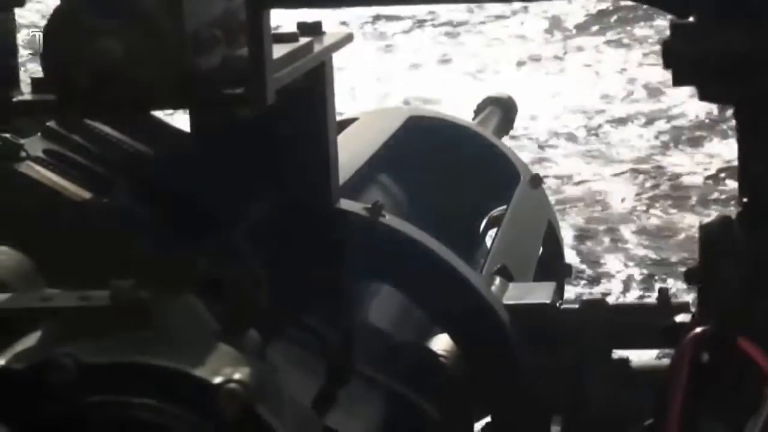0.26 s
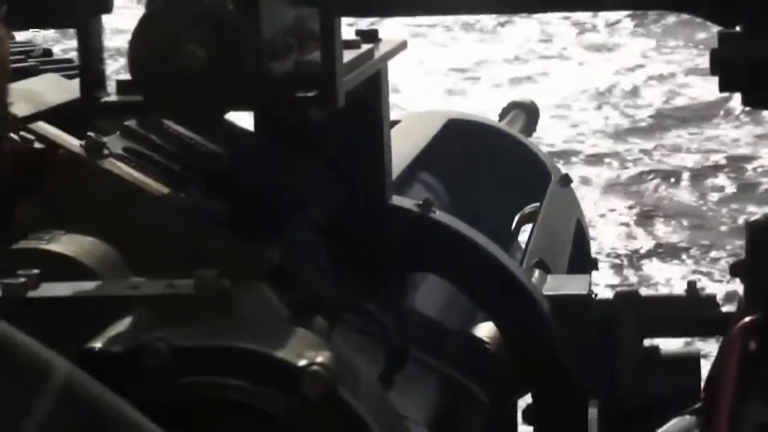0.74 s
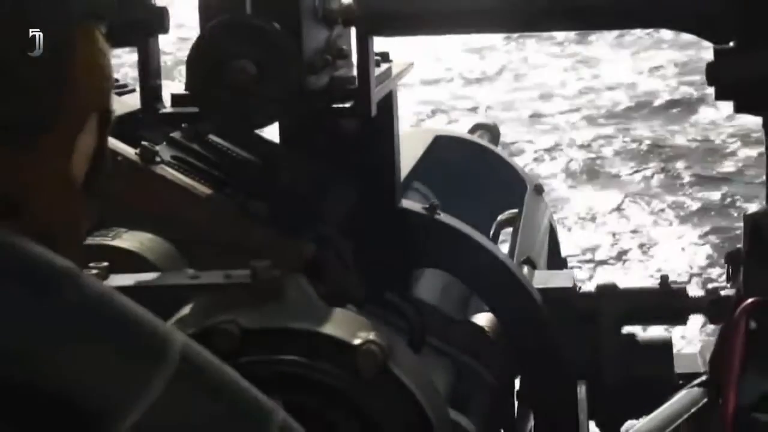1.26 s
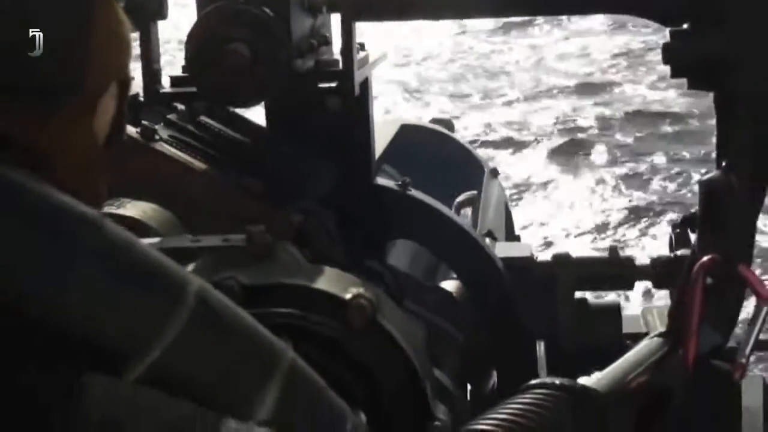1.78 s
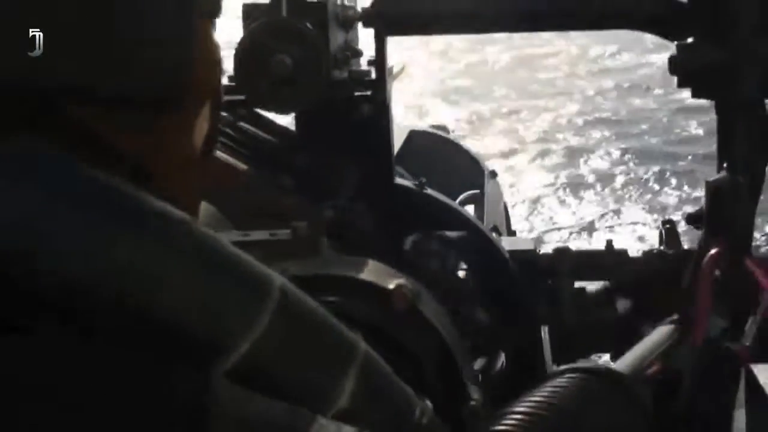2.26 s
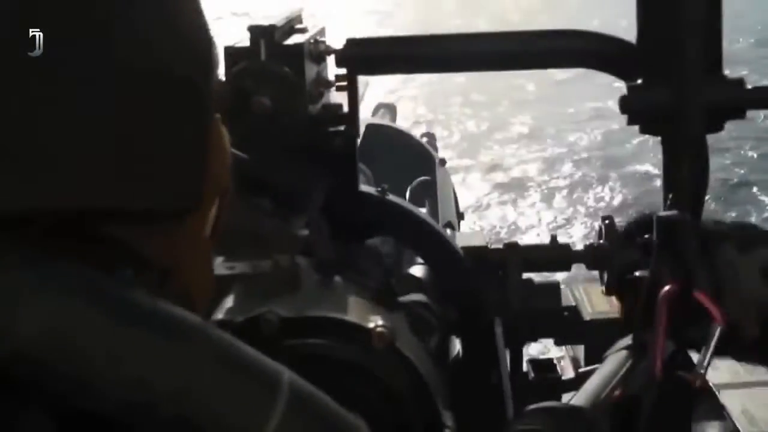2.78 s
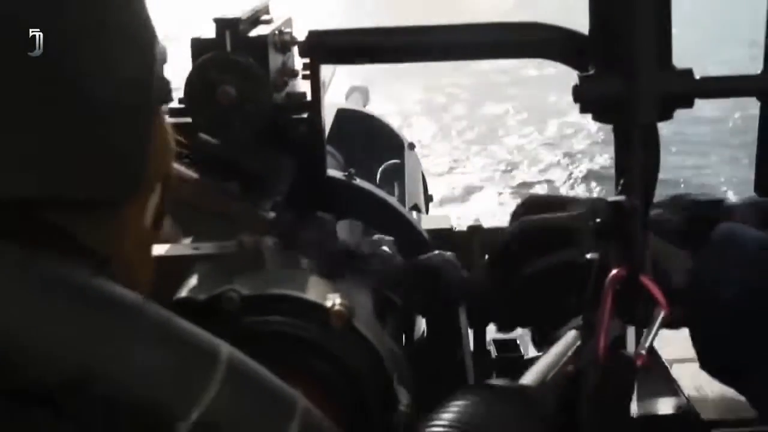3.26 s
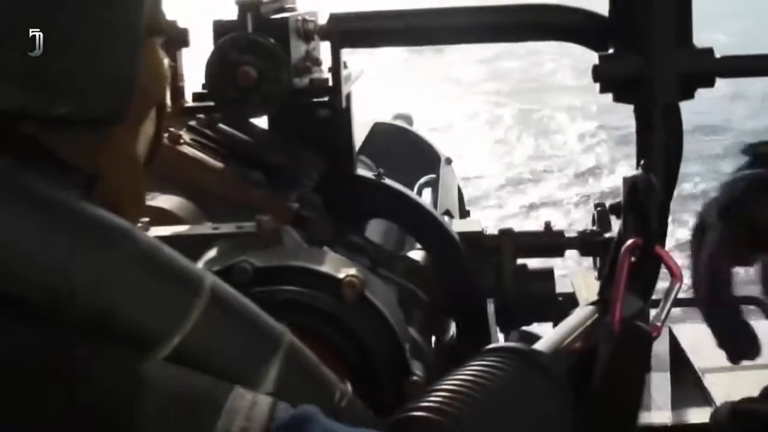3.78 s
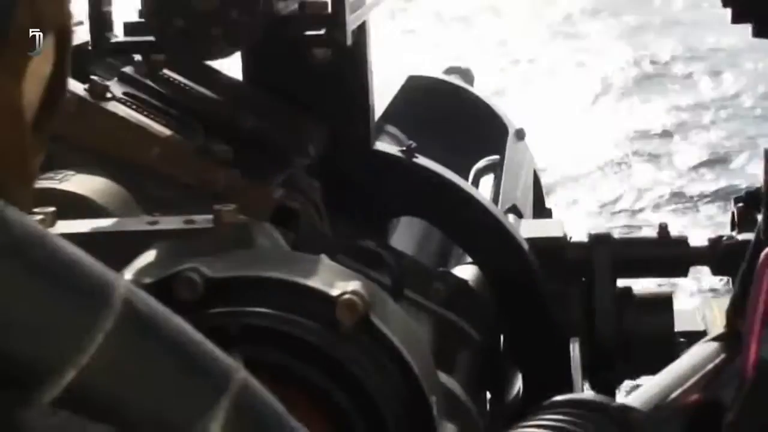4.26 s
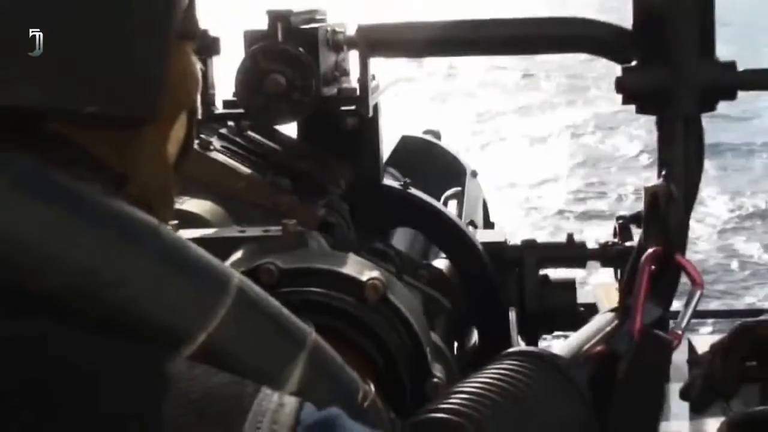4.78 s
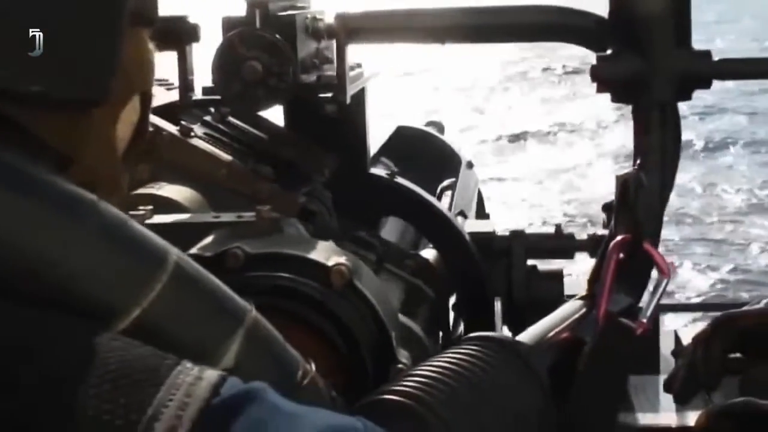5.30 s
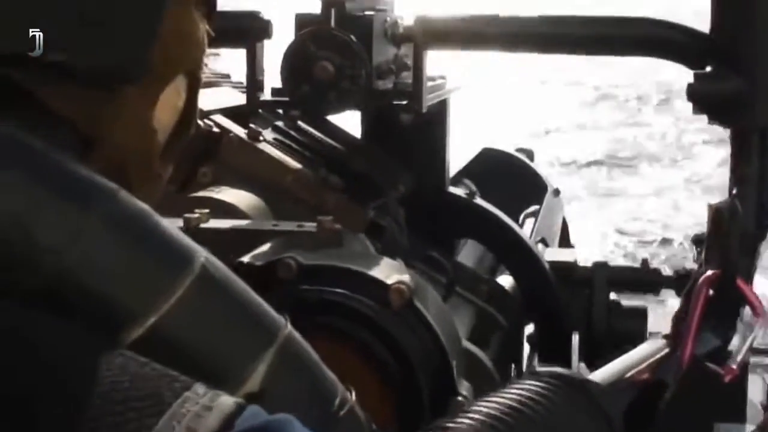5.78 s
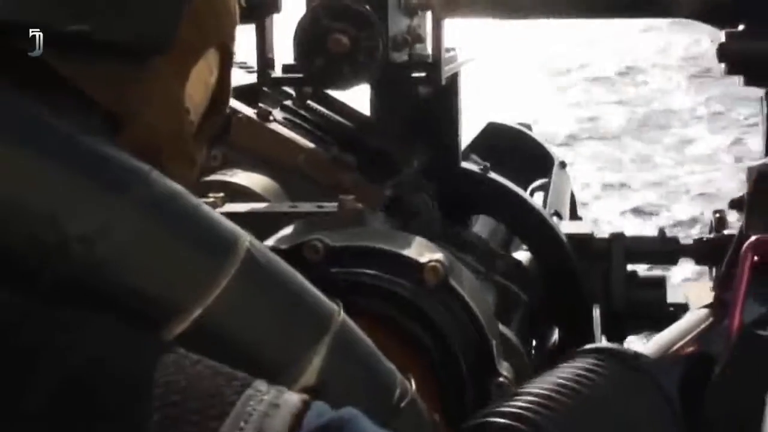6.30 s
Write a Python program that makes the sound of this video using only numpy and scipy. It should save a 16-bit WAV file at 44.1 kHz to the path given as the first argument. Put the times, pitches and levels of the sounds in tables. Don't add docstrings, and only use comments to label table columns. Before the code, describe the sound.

Motor-driven cannon on a boat deck fires a five-round burst, then a single late shot, with clanking bolt, clinking cases and engine hum between.

```python
import sys
import numpy as np
from scipy import signal
from scipy.fft import rfft, irfft, next_fast_len
from scipy.io import wavfile
from scipy.ndimage import uniform_filter1d, map_coordinates

SR = 44100
rng = np.random.default_rng(int(sys.argv[2]) if len(sys.argv) > 2 else 0)


def invert_db(x):
    u = np.asarray(x, float) / 20
    return 10 ** u


def transcribe(signal):
    frames = np.atleast_2d(signal).T
    limited = np.clip(frames, -1, 1)
    pcm = np.round(limited * 32767).astype(np.int16)
    wavfile.write(sys.argv[1], SR, pcm)


N = 288414

# t/s, blast level ahead of the limiter/dB
SHOTS = [
    (-0.55, -3),
    (2.058, 4.5),
    (2.352, 3.5),
    (2.650, 1),
    (2.950, 2),
    (3.248, 1),
    (6.369, 2),
]
# press t/s, release t/s, motor already turning for/s, rattle level/dB
PULLS = [
    (1.834, 3.439, .025, -0.5),
    (6.145, 6.6, .06, 2),
]
# f/Hz, level per Hz/dB
CHAIN_COLOUR = [(88, -42.5), (150, -10), (462, -12.5), (618, -1), (2410, -2.5), (2790, -7.5), (3230, -4.5),
                (4810, -9), (5460, -7), (10500, -15.5), (11500, -22), (15000, -54.5), (22000, -120)]


def unit(x):
    return x / np.sqrt(np.mean(x ** 2) + 1e-20)


def along(points, hz):
    f, *cols = np.transpose(points)
    return [np.interp(np.log(hz + 1), np.log(f + 1), c) for c in cols]


def wobble(rate):
    knots = rng.standard_normal(int(N * rate / SR) + 4)
    return map_coordinates(knots, [np.arange(N) * rate / SR])


def filtered(x, response):
    m = next_fast_len(len(x) + 8192)
    return irfft(rfft(x, m) * response(np.fft.rfftfreq(m, 1 / SR)), m)[:len(x)]


def colour(spectrum, f):
    return invert_db(along(spectrum, np.minimum(f, 11400))[0])


def peaks(table, f):
    return sum(invert_db(db) / (1 + (2 * (f - c) / w) ** 2) for c, w, db in table)


def noise_decay(t, t60):
    return rng.standard_normal(len(t)) * invert_db(-60 * t / t60)


def add(track, s, sound):
    part = track[round(s * SR):][:len(sound)]
    part += sound[:len(part)]


def ring(modes, t, scatter_db):
    hz, db, t60 = np.transpose(modes)[:, :, None]
    luck = rng.standard_normal((2, len(modes), 1))
    envelope = invert_db(db + scatter_db * luck[1] - 60 * t / t60)
    tones = np.sin(2 * np.pi * hz * (1 + 0.0014 * luck[0]) * t) * envelope
    return tones.sum(0) / np.linalg.norm(invert_db(db))


def chatter(sound, t, spread):
    short = t[:SR // 20]
    contacts = rng.standard_normal(len(short)) ** 3 * (short / spread) ** .5 * np.exp(-short / spread)
    return signal.fftconvolve(sound, contacts / np.linalg.norm(contacts))[:len(t)]


def knock(t, t60):
    # f/Hz, level/dB, t60/s
    deck_modes = [(700, -4, .09), (880, 0, .07), (1010, 0, .07), (1425, 0, .09), (2050, -3, .05)]
    puff = filtered(noise_decay(t, t60), lambda f: f / 900 / (1 + (f / 1700) ** 7))
    return .55 * ring(deck_modes, t, scatter_db=3.5) * (1 - np.exp(-t / .003)) + 2.1 * puff


def sea():
    hiss = filtered(rng.standard_normal(N), lambda f: (f > 1200) / (1 + (f / 2500) ** 1.5))
    return invert_db(-73.5) * unit(hiss)


def steady_tone(hz, db):
    phase = 2 * np.pi * np.cumsum(hz + .6 * wobble(6)) / SR
    return np.sqrt(2) * invert_db(db + 1.5 * wobble(10)) * np.sin(phase)


def engine():
    # t/s, firing tone level/dB
    tone_levels = [(0, -64), (.232, -66), (.364, -50), (.572, -53), (.744, -55), (.892, -55.5), (1.21, -53),
                   (1.292, -51), (1.82, -46), (3.9, -64.5), (4.1, -52), (4.16, -50), (4.23, -48),
                   (4.34, -50.5), (5.22, -49.5), (5.66, -42.5), (5.96, -41), (6.12, -41)]
    # f/Hz, level per Hz/dB
    rumble_colour = [(12, -39), (20, -3.5), (54, -2), (108, 0), (166, -3.5), (221, -6.5), (306, -7),
                     (361, -16.5), (399, -9), (531, -17), (612, -12), (939, -15.5), (1300, -20),
                     (1650, -35), (2600, -49.5), (3380, -76), (5720, -120)]
    # f/Hz, level/dB
    hum_tones = [(264, -61.5), (312, -65.5), (468, -66.5)]
    firing_hz, second_hz = 107, 219.4
    tone_db = np.interp(np.arange(N) / SR, *np.transpose(tone_levels))
    lift_db = tone_db + 49
    second_db = -54.5 + 0.6 * lift_db + 2.0 * wobble(3)
    rumble_db = -46 + 0.25 * lift_db + 0.48 * wobble(13) + 1.1 * wobble(60)
    rumble = unit(filtered(rng.standard_normal(N), lambda f: invert_db(along(rumble_colour, f)[0])))
    hum = steady_tone(firing_hz, tone_db) + steady_tone(second_hz, second_db)
    hum += sum(steady_tone(hz, db) for hz, db in hum_tones)
    return hum + invert_db(rumble_db) * rumble


def scrape(t):
    envelope = invert_db(-60 * t / 0.026) + 0.106 * invert_db(-60 * t / 0.16)
    return filtered(rng.standard_normal(len(t)) * envelope, lambda f: (f > 1800) / (1 + (f / 13000) ** 4))


def settling(t):
    return 0.33 + 0.69 * invert_db(-60 * t / 0.07)


def landings():
    # long ring/dB, upper ring/dB, top ring/dB, knock/dB
    poses = [
        (-6, -13, -15, -5.5),
        (-20, -8.5, -12.5, -4.5),
        (-14, -11, -9.5, -5),
        (-23, -28, -21, 16.5),
    ]
    # t/s, peak level/dB, extra ring/dB
    on_mouth = [(.2146, -29, -6), (.2462, -55, 10), (.3067, -27.5, -3.5), (.4035, -61, 5), (.4295, -53, 2),
                (.4792, -61, 9), (.5217, -48, -11), (.5545, -45, 6), (.7392, -31.5, -6), (.829, -49, 4),
                (1.245, -68, 7), (3.8794, -56, 1), (3.9644, -60, 6), (4.915, -54, 2), (4.99, -45.5, 9),
                (5.9199, -54, 1.5), (5.9437, -50.5, -1)]
    # t/s, peak level/dB, extra ring/dB
    on_side = [(.3234, -24.5, -1), (.3644, -44, 1), (.7864, -39.5, 6), (1.6205, -50.5, -3),
               (1.6472, -47.5, -1), (4.9072, -26, -4), (4.9806, -34.5, 9.5), (5.0846, -43.5, 10),
               (5.3872, -36.5, -3.5), (5.7054, -53, 1)]
    # t/s, peak level/dB, extra ring/dB
    on_rim = [(.165, -30.5, -4), (.175, -24.5, -7), (.2261, -32.5, 3), (.3375, -21, -4), (.7672, -35.5, 8),
              (.982, -54.5, -12), (1.6985, -48, -2), (1.7492, -56, 1), (1.7868, -53.5, 2),
              (4.9004, -34.5, 0), (4.9731, -45.5, 18), (5.2497, -45, -9), (5.3647, -47, -6)]
    # t/s, peak level/dB, extra knock/dB
    on_base = [(.0044, -41, -7), (.0344, -54.5, 9), (0.1388, -31, -4), (0.3365, -28, -13), (3.7506, -48, 2),
               (3.8015, -42, -2), (3.831, -34, -8), (3.9364, -46, -10), (4.14, -61.5, 11.5),
               (4.1897, -62, 11), (4.2385, -59.5, 10.5), (4.447, -51.5, -5.5), (4.4566, -45, -5),
               (4.4994, -44, 0.5), (4.5156, -43, 3.5), (5.7394, -57.5, 3), (5.8684, -66, -5)]
    out = []
    for rows, pose, own in zip([on_mouth, on_side, on_rim, on_base], poses, np.eye(len(poses))):
        for s, db, extra_db in rows:
            out.append((s, db, *(np.array(pose) + extra_db * own)))
    return out


def cases():
    # f/Hz, level/dB, t60/s
    wall_modes = [(2600, -9, .04), (3250, -7, .045), (3960, -9, .06), (4600, -12, .05), (5100, -12, .06),
                  (6000, -4, .05), (6620, -6, .06), (7170, -2, .055), (7750, -9, .05)]
    # f/Hz, level/dB, t60/s
    ring_modes = [
        [(6232, 0, .27), (6266, -4, .22)],
        [(8415, 0, .07), (8330, -20, .18)],
        [(9680, -3, .06), (10700, -2, .045), (11030, 0, .04), (11450, -11, .06), (12350, -12, .08)],
    ]
    out, t = np.zeros(N), np.arange(SR // 2) / SR
    settle = settling(t)
    for s, db, *rings_db, knock_db in landings():
        rings = sum(invert_db(level + 1.5) * ring(modes, t, scatter_db=4.5)
                    for level, modes in zip(rings_db, ring_modes))
        wall = chatter(0.52 * scrape(t) + 0.48 * ring(wall_modes, t, scatter_db=4.0), t, spread=0.0056)
        clink = settle * wall + chatter(settle * rings, t, spread=0.0043)
        thump = invert_db(knock_db - 7.0) * knock(t, t60=0.091)
        add(out, s, invert_db(db - 1.5) * (clink + thump))
    return out


def belt_link():
    # t/s, peak level/dB, knock/dB
    drops = [
        (4.406, -56, 29.5),
        (4.7611, -29.5, 5.5),
        (4.7719, -16.5, -6),
        (4.795, -43.5, 11),
    ]
    # f/Hz, level/dB, t60/s
    link_modes = [(2654, -6, .05), (3200, -6, .04), (3967, -5, .06), (5100, -10, .04), (6142, -5, .045),
                  (7321, -2, .085), (8608, 0, .095), (9787, -14, .07)]
    out, t = np.zeros(N), np.arange(SR // 2) / SR
    swell = 1 - np.exp(-t / 0.00117)
    for s, db, knock_db in drops:
        steel = chatter(settling(t) * ring(link_modes, t, scatter_db=0.5), t, spread=0.0038)
        body = 0.87 * scrape(t) + 1.38 * steel + invert_db(knock_db) * knock(t, t60=0.065)
        add(out, s, invert_db(db - 14.0) * swell * body)
    return out


def heavy_thud():
    # t/s, peak level/dB
    thuds = [
        (0.11, -16),
        (0.127, -20.5),
    ]
    # f/Hz, level/dB, t60/s
    locker_modes = [(194, -4, 0.39), (332, -9, 0.32), (427, -18, 0.2), (549, -9, 0.59), (711, -3, 0.072),
                    (864, -40, 1.1), (1004, -27, 2.6)]
    out, t = np.zeros(N), np.arange(SR // 2) / SR
    damped = [(hz, level, min(t60, .3)) for hz, level, t60 in locker_modes]
    for s, db in thuds:
        puff = filtered(noise_decay(t, 0.4), lambda f: 1 / (1 + (f / 1800) ** 3.3))
        add(out, s, invert_db(db - 10) * (ring(damped, t, scatter_db=0.5) + 1.1 * puff))
    return out


def blows():
    # opening a burst, lead before round/s, peak/dB; the same two within a burst; part
    chain_turn = [
        (.145, -12.5, 0.15, -16.5, "cam"),
        (.079, -15, 0.065, -31.5, "pawl"),
        (.041, -24.5, .04, -32.5, "ram"),
        (0.0068, 3, 0.0093, -7.5, "lock"),
    ]
    # t/s, peak level/dB
    feeds = [(1.9428, 2), (2.2553, -4), (2.5425, -2.5), (2.836, -3.5), (3.1426, -5.5), (6.2625, -5)]
    # t after press/s, peak level/dB, part
    engaging = [
        (.009, -26, "sear"),
        (.03, -21.5, "cam"),
    ]
    # t/s, peak level/dB, part
    strays = [(1.8944, -22.5, "cam"), (1.964, -27.5, "pawl"), (3.4099, -7.5, "cam"),
              (3.5499, -25.5, "feed"), (3.6094, -32, "feed"), (3.6526, -19.5, "lock"), (6.252, -5, "cam"),
              (6.52, -5, "sear")]
    out = []
    shots = [s for s, _ in SHOTS]
    for last, s in zip(shots, shots[1:]):
        opens_burst = s - last > .5
        for first_s, first_db, later_s, later_db, part in chain_turn:
            out.append((s - first_s, first_db, part) if opens_burst else (s - later_s, later_db, part))
    for press, *_ in PULLS:
        out += [(press + lag, db, part) for lag, db, part in engaging]
    return out + [(s, db, "feed") for s, db in feeds] + strays


def bolt():
    part_voices = {"sear": (13, -22, -25, -17), "cam": (-6, -14.5, -18, -21),
                   "feed": (-14, -19.5, -21, -12), "pawl": (-6.5, -24, -5.5, -25.5),
                   "ram": (6.5, -8, -18.5, -17), "lock": (-2.5, -18.5, -23, -19.5)}
    # f/Hz, level/dB, t60/s
    steel_modes = [
        [(4030, 0, .045), (2865, -4, .08)],
        [(4900, 0, .12), (6995, -4, .08), (5980, -10, .07)],
        [(8120, 0, .045), (6100, -6, .04)],
    ]
    # f/Hz, level/dB, t60/s
    breech_modes = [(2860, 0, .06), (3680, -4, .04), (5500, -5, .05), (6350, -8, .05), (8900, -8, .05),
                    (9870, -10, .05), (10900, -9, .05)]
    out, t = np.zeros(N), np.arange(SR // 4) / SR
    for s, db, part in blows():
        knock_db, *rings_db = part_voices[part]
        crack = rng.standard_normal(len(t)) * (invert_db(-60 * t / .03) + .3 * invert_db(-60 * t / .12))
        crack = filtered(crack, lambda f: invert_db(10.5) * colour(CHAIN_COLOUR, f) * (f > 1500))
        steel = sum(invert_db(level + 13) * ring(modes, t, scatter_db=2.5)
                    for level, modes in zip(rings_db, steel_modes))
        block = chatter(0.57 * ring(breech_modes, t, scatter_db=1.5), t, spread=.002)
        thump = invert_db(knock_db - 1) * knock(t, t60=.05)
        add(out, s, invert_db(db - 11) * (crack + chatter(steel, t, spread=.003) + block + thump))
    return out


def bulkheads(x):
    t = np.arange(SR // 4) / SR
    tail = noise_decay(t, 0.14) * (t > .003)
    return invert_db(-11.0) * signal.fftconvolve(x, tail / np.linalg.norm(tail))[:N]


def drive():
    # t after press/s, rattle level/dB
    chain_load = [(0, -35), (.01, -35.5), (.083, -22.5), (.097, -23), (.115, -20), (.163, -28), (.2, -23.5),
                  (.45, -31.5)]
    # f/Hz, width/Hz, level/dB
    housing = [(2940, 48, 3.5), (4060, 82, -3), (5030, 32, -8), (5850, 47, -11.5), (5930, 200, 2.5),
               (6990, 66, -9.5), (7800, 130, -0.5), (10900, 38, -10.5)]
    whine_hz, spin_up_s, whine_s = 10900, .037, .203
    run_down_db_per_s = 112
    brighten_s, dull_hz = 0.058, 2500
    t, level, whine, slow = np.arange(N) / SR, np.zeros(N), np.zeros(N), np.zeros(N)
    for press, release, head, db in PULLS:
        age = np.maximum(t - press, 0)
        pressed = t > press
        load_db = np.interp(age, *np.transpose(chain_load))
        load_db -= run_down_db_per_s * np.maximum(t - release, 0)
        level += invert_db(db + load_db) * pressed
        slow += np.exp(-age / brighten_s) * pressed
        slip = np.exp(-(age + head) / spin_up_s)
        phase = 2 * np.pi * np.cumsum(whine_hz * (1 - slip) * (1 + 0.0041 * wobble(300))) / SR
        whine_level = invert_db(-56 - 16 * slip + 3 * wobble(120))
        whine += whine_level * np.sin(phase) * pressed * (age < whine_s)
    ticks = rng.standard_normal(N) * invert_db(4 * wobble(200) + 2.5 * wobble(45))
    rattle = unit(filtered(ticks, lambda f: colour(CHAIN_COLOUR, f) * (1 + 0.55 * peaks(housing, f))))
    fizz = filtered(rattle, lambda f: 1 / (1 + (dull_hz / (f + 1)) ** 4))
    return whine + level * invert_db(-0.5) * (rattle - slow * fizz)


def blasts():
    # f/Hz, level per Hz/dB
    blast_colour = [(18, -48), (30, -18), (97, -3), (243, -0.5), (335, -3.5), (475, -3), (538, -3),
                    (822, -4), (1030, -4), (2930, -11.5), (7530, -13), (11500, -20.5), (15000, -52.5),
                    (22000, -120)]
    # f/Hz, build-up/s, roll t60/s, far echo level/dB, echo t60/s
    mount_roll = [(40, .12, 0.39, -20, 1.7), (80, 0.089, 0.35, -30, 2), (129, 0.13, 0.54, -29, 2.8),
                  (250, 0.097, 0.46, -33.5, 2.2), (604, 0.061, 0.4, -32, 2.3),
                  (1320, 0.027, 0.41, -27, 1.97), (2470, 0.0059, 0.34, -27, 1.37),
                  (4360, 0.0056, 0.27, -16, 0.76), (9200, 0.0053, 0.3, -21.5, 0.83),
                  (15000, 0.0053, 0.41, -55, 0.45)]
    # f/Hz, width/Hz, level/dB
    plates = [(108, 4.7, -9), (197, 12, -0.5), (221, 17, -5.5), (322.4, 22, -1), (344, 34, 0),
              (374, 35, -9.5), (550, 25, -13.5), (610, 20, -6.5), (768, 13, -5.5)]
    out = np.zeros(N + SR)
    for s, db in SHOTS:
        hz, t, z = signal.stft(rng.standard_normal(int(1.6 * SR)), SR, nperseg=256)
        build, t60, far_db, far_t60 = along(mount_roll, hz[:, None])
        gather = (1 - np.exp(-(t + .002) / (0.32 * build))) ** 2
        decay = invert_db(-60 * t / t60) + invert_db(far_db - 60 * t / far_t60)
        roll = signal.istft(z * gather * decay, SR, nperseg=256)[1]
        roll = filtered(roll, lambda f: colour(blast_colour, f) * (1 + 0.58 * peaks(plates, f)))
        age = np.arange(len(roll)) / SR
        early_clumps_db = 4.1 * np.exp(-age / 0.18) * wobble(150)[:len(roll)]
        clumps_db = 1.1 * wobble(45)[:len(roll)]
        roll *= invert_db(early_clumps_db + clumps_db) * (1 - np.exp(-age / 0.0044))
        add(out, s + 1, invert_db(db) * roll / np.sqrt(np.mean(roll[:SR // 10] ** 2)))
    return out[SR:]


def scene():
    metal = bolt() + cases() + belt_link() + heavy_thud()
    return (blasts() + drive() + metal + bulkheads(metal) + engine() + sea())[None]


def top_cut(x):
    return signal.sosfilt(signal.butter(12, 16480, fs=SR, output="sos"), x)


def record(dry):
    loudness = np.sqrt(np.abs(uniform_filter1d(dry ** 2, size=900)))
    held = dry / (1 + (loudness / invert_db(-15.5)) ** 4) ** 0.07
    flat = held / (1 + np.abs(held / 0.3) ** 3) ** (1 / 3)
    low_cut_hz, twist_hz, shelf_hz, shelf_db = 48.5, 912.5, 11811.0, -11.0
    cut = lambda f: 1j * f / (low_cut_hz + 1j * f)
    twist = lambda f: ((twist_hz - 1j * f) / (twist_hz + 1j * f)) ** 2
    shelf = lambda f: invert_db(shelf_db / (1 + (shelf_hz / (f + 1)) ** 40)) / (1 + (f / 15600) ** 90)
    shaped = filtered(flat[0], lambda f: cut(f) * twist(f) * shelf(f))
    capped = shaped / (1 + np.abs(shaped / 0.6) ** 6) ** (1 / 6)
    finished = filtered(capped, lambda f: f < 15850)[None]
    return top_cut(finished)


dry = scene()
out = record(dry)
transcribe(out)
```